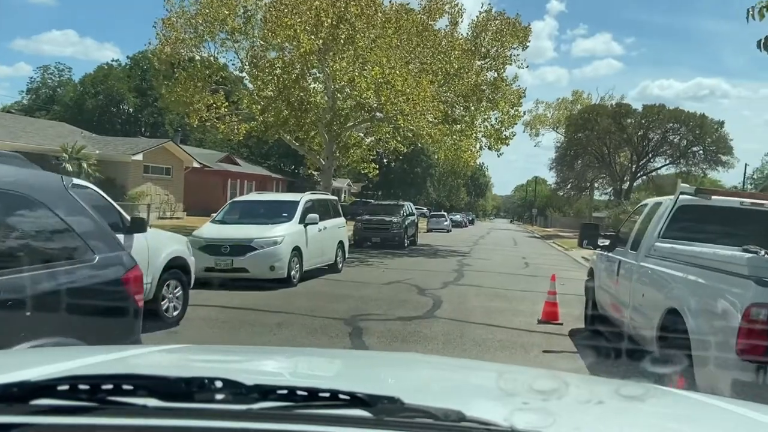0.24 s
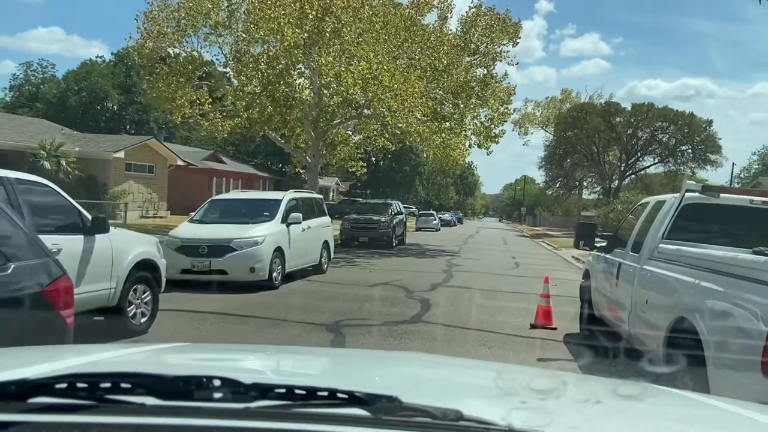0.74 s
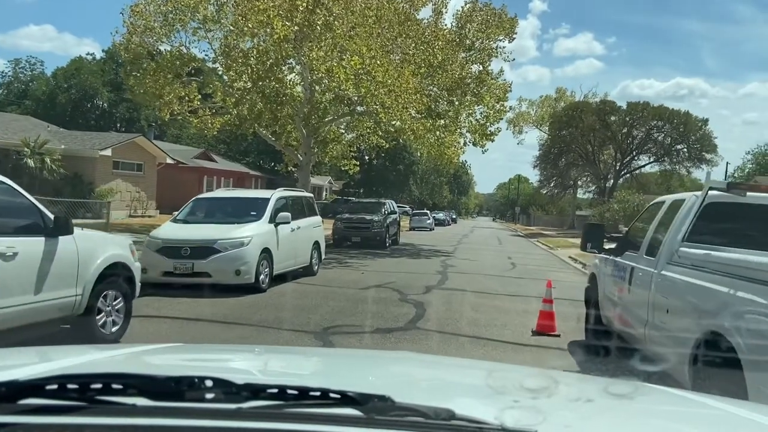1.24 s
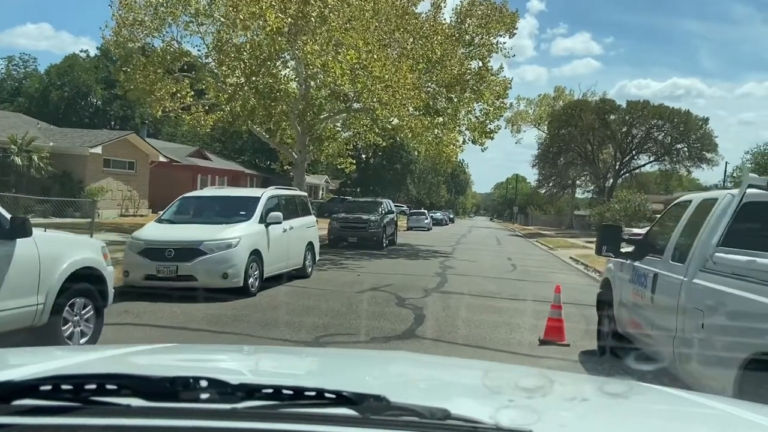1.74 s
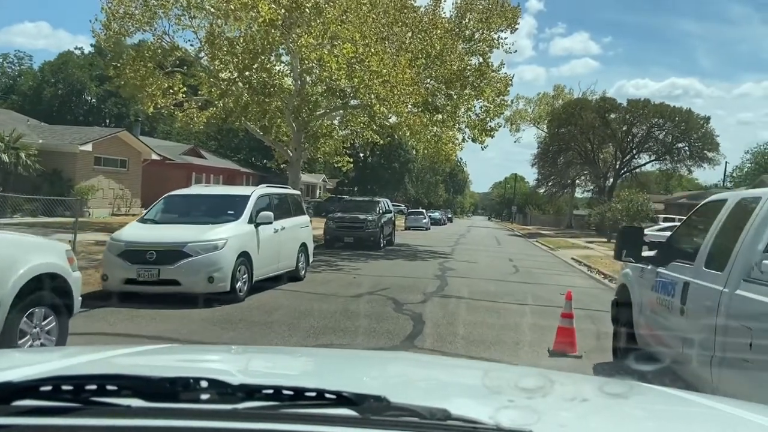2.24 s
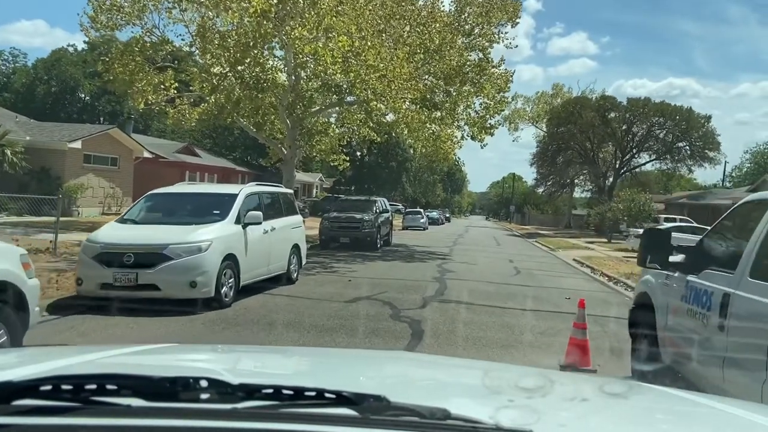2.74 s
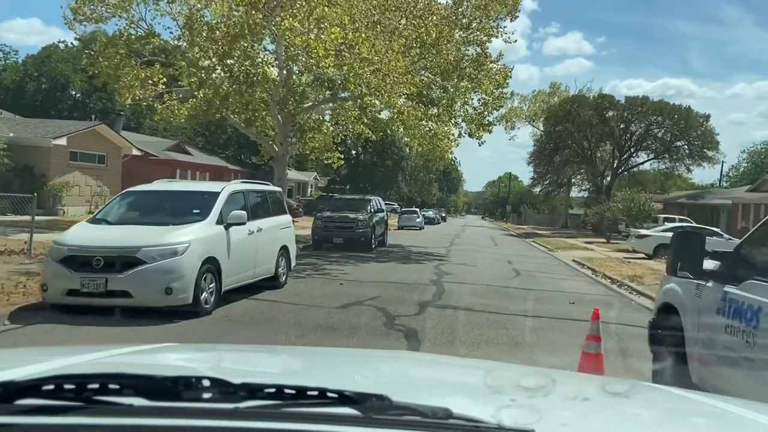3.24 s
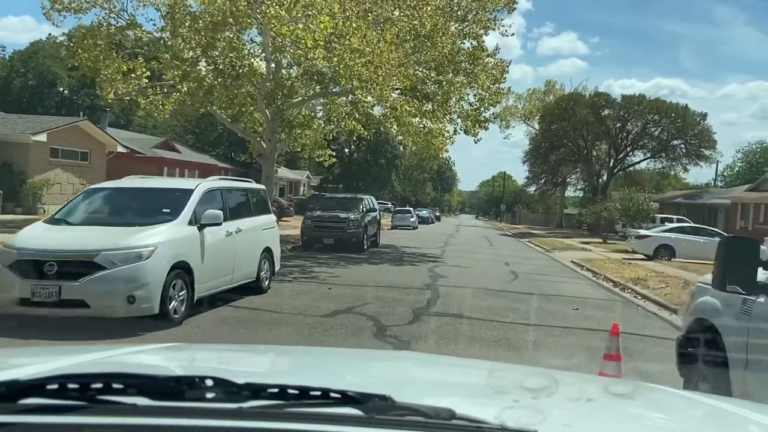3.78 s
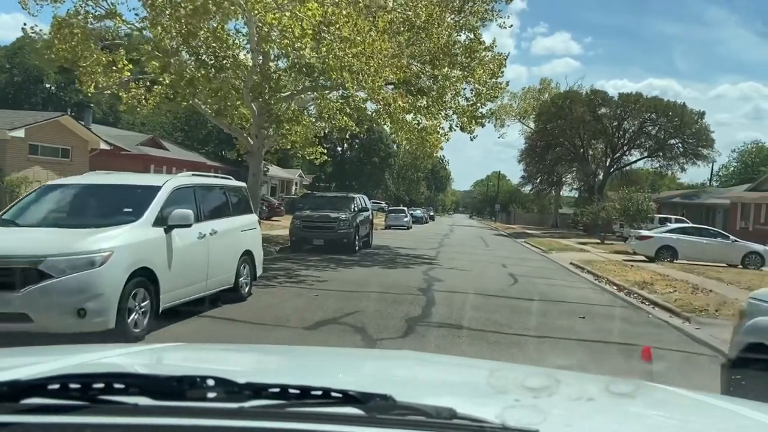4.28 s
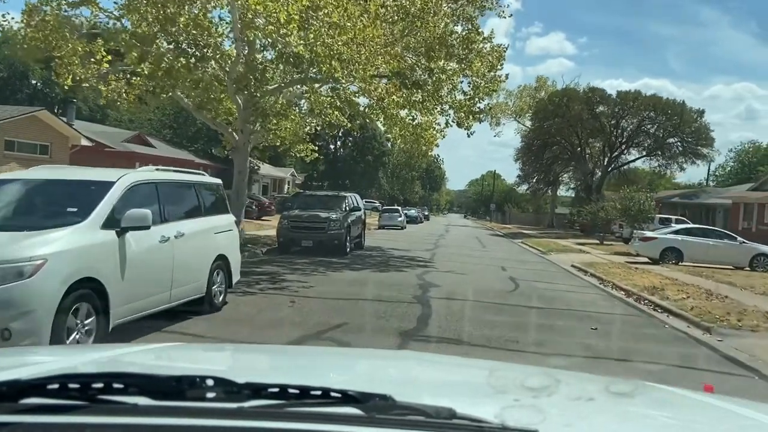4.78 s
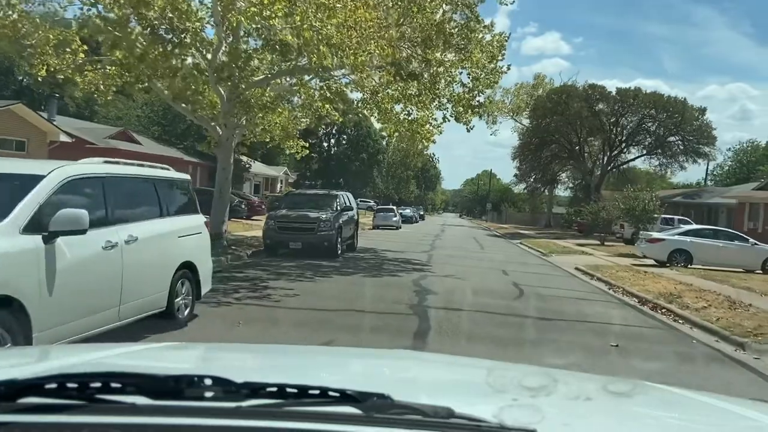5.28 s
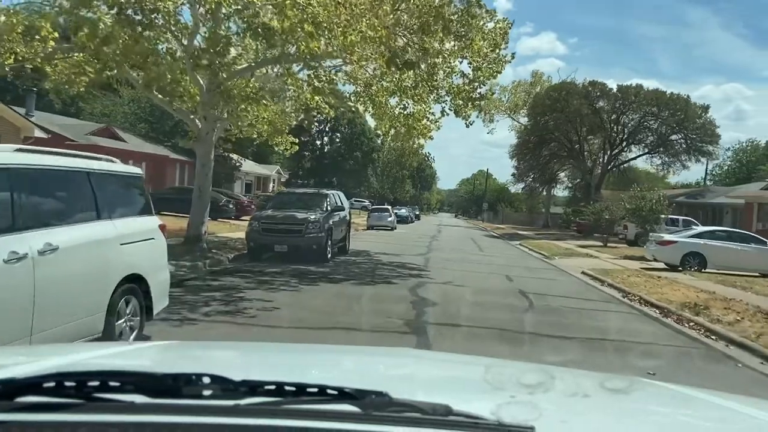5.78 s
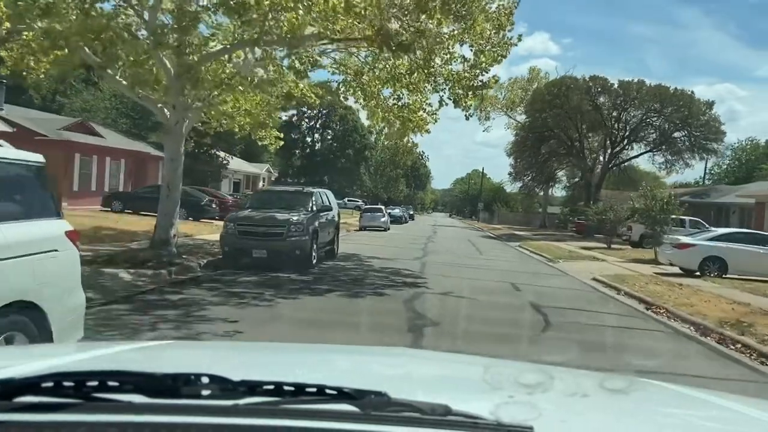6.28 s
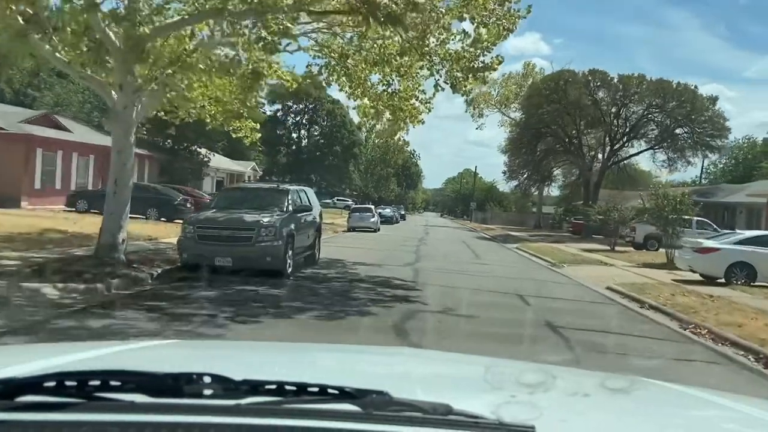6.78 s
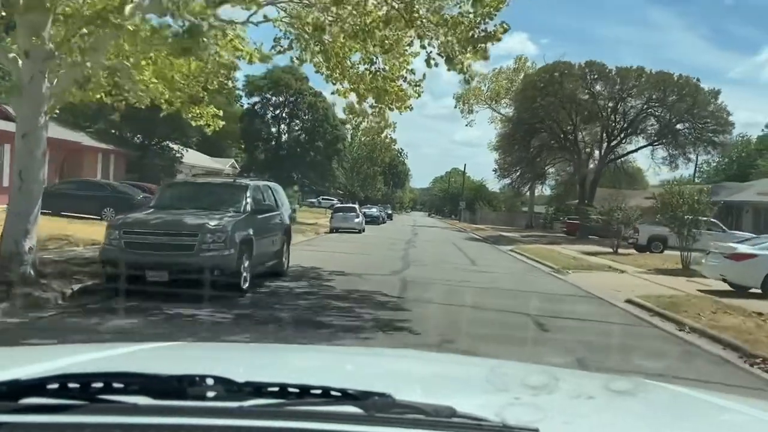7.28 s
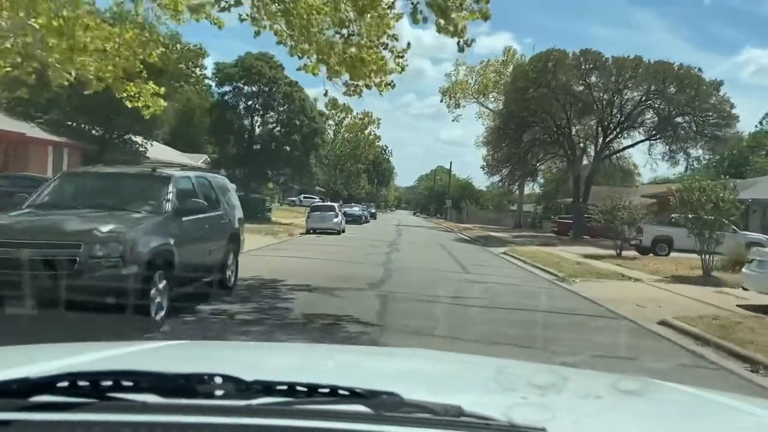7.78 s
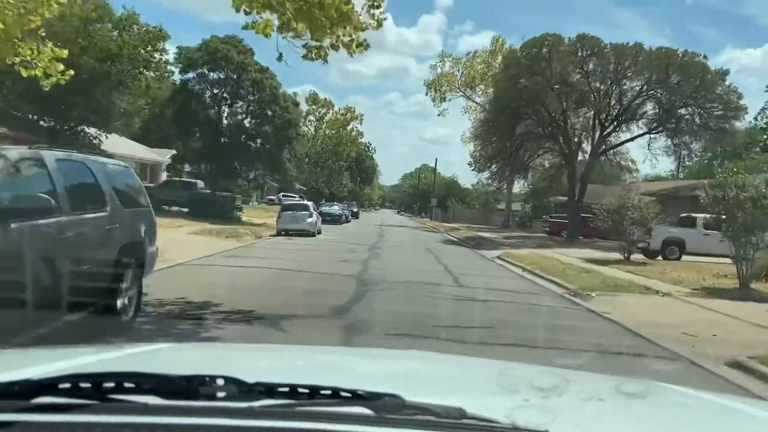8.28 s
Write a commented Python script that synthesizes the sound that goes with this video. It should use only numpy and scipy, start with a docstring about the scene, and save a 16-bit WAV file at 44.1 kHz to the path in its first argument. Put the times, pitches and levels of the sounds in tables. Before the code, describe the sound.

Heard inside a pickup cab creeping along a residential street: a soft, lumpy low idle with blower hum and airy vent hiss. A dull padded knock comes near three seconds. Around five seconds the engine revs up smoothly, booming and growling through the panels, then holds a loud rising drone over road rumble, with faint trim ticks.

```python
"""Pickup cab, creeping at idle then pulling away

Inside the cab of an eight-cylinder pickup on a street, heard through two microphone ports.
The exhaust booms in sines at the firing rate and its half orders, coloured by the cab; panels growl
and sing through resonances. Body and road rumble and the rasp are shaped noise, the vent blower
hums in tones and hisses in noise, and struck modes make the trim knock and tick now and then."""
import sys
import numpy as np
from scipy import signal
from scipy.fft import rfft, irfft, next_fast_len
from scipy.io import wavfile

SR = 44100
rng = np.random.default_rng(int(sys.argv[2]) if len(sys.argv) > 2 else 0)


def unload_wav(signal):
    """Save mono or channel-first audio to the path in sys.argv[1] as 16-bit WAV at rate SR, clipped to [-1, 1]."""
    wavfile.write(
        sys.argv[1],
        SR,
        np.round(np.clip(np.atleast_2d(signal).T, -1, 1) * 32767).astype(np.int16),
    )


N = 376025

# Engine speed as firing rate: time_s, firing_hz
FIRING_RATE = [(0.0, 40.3), (0.75, 38.9), (1.4, 40.2), (2.5, 39.8), (3.0, 40.5), (3.4, 42.0), (3.75, 43.5),
               (3.9, 44.8), (4.05, 49.5), (4.2, 51.5), (4.33, 54.0), (4.6, 54.5), (4.75, 53.2), (4.9, 54.2),
               (5.14, 59.4), (5.46, 68.5), (5.73, 79.8), (5.95, 87.5), (6.15, 90.6), (6.5, 94.5),
               (6.7, 98.7), (7.0, 102.5), (7.28, 106.4), (7.5, 111.5), (7.75, 113.8), (8.0, 117.3),
               (8.53, 123.2)]
# Exhaust tones: cycle_multiple, relative_level_db at idle, gain_db per doubling of speed, waver_db
STRONG_ORDERS = [(8, -0.7, 1, 1), (16, -19, 0.5, 1)]
# What pipe and cab make of an exhaust tone, by its pitch: pitch_hz, mid_db, side_db
EXHAUST_PATH = [(30, -48.5, -69), (41, -69, -55), (43.7, -31, -46), (48.5, -17, -43), (52.2, -17, -39),
                (60.6, -12, -32), (69.5, -14, -32.5), (82, -14, -28.5), (88.7, -15, -32.5),
                (90.8, -16.5, -36.5), (108, -13.5, -29), (109.7, -13.5, -26.5), (113.8, -15, -19.5),
                (115.9, -30.5, -19.5), (118.6, -23.5, -22), (120.2, -34, -26), (121.3, -22, -28),
                (122.8, -15.5, -25), (123.2, -12, -24.5), (137, -10.5, -17.5), (156, -27, -29),
                (182, -20, -32.5), (185, -44.5, -39), (202.4, -19, -18), (223.3, -6.5, -8),
                (228.4, -13, -11), (237, -16, -20), (252, -17.5, -20)]
# Fifth multiple of the cycle rate, which with the fourth gives the growl its beat: firing_hz, level_db
FIFTH_MULTIPLE = [(39, -52), (62, -44), (72, -36.5), (80, -23), (88, -17), (92, -15), (95, -13),
                  (99, -15.5), (103, -16), (107, -19.5), (111, -20), (114, -20.5), (124, -24)]
# Fourth multiple of the cycle rate: firing_hz, level_db
FOURTH_MULTIPLE = [(39, -53), (54, -48), (80, -42.5), (100, -33.5), (107, -35), (111, -29.5), (117, -24),
                   (119, -30.5), (121, -21.5), (124, -25.5)]
# Uneven cylinders: cycle_multiple, relative_level_db at idle, gain_db per doubling of speed
WEAK_ORDERS = [(2, -1, 3), (3, 10, 3.5), (6, 7, 1), (7, 8.5, -3.5), (9, 2, 1), (10, -2.5, 3.5),
               (11, 3, 2.5), (12, -3, 0.5), (13, 2.5, 0.5), (24, 3, -3)]
# How the cab passes the weak orders: pitch_hz, gain_db
CAB = [(25, -31.5), (45, -10), (62, 2), (72, -3.5), (87, 2), (105, 2), (119, -12.5), (128, -2), (133, -6),
       (138, -11.5), (145, -13), (170, -15), (200, -9), (250, -12.5), (290, -18), (330, -11), (350, -18),
       (378, -9), (425, -28.5), (460, -9), (485, -15.5), (510, -4.5), (545, -28.5), (650, -37)]
# Width of the weak orders: pitch_hz, side_minus_mid_db
WEAK_SIDE = [(50, -25), (100, -10), (130, -8.5), (200, -2.5), (300, 6.5), (420, 8), (500, -3)]
# Firings turn lumpy again as the load eases: centre_s, half_length_s, waver_db
EASING = [(8.05, .22, 3)]
# Multiples of the cycle rate through the panels: cycle_multiple, mid_relative_db, side_relative_db
GROWL_ORDERS = [(14, -16, -18), (15, -18, -15.5), (17, -15, -6.5), (18, -21, -18), (19, -15, -10.5),
                (20, -13.5, -16), (21, -16, -20), (22, -19, -17.5), (23, -16.5, -16), (24, -13, -14.5),
                (25, -15.5, -18), (26, -19.5, -15), (27, -22, -13.5), (28, -13.5, -11), (29, -17.5, -16.5),
                (30, -17.5, -14), (31, -19.5, -18.5), (32, -16, -12.5), (33, -20, -14.5), (34, -14.5, -14),
                (35, -19.5, -16), (36, -16.5, -19), (37, -23, -18.5), (38, -18.5, -20), (39, -14, -17.5),
                (40, -10.5, -21), (41, -15, -17), (42, -19.5, -20.5), (44, -16.5, -18)]
# Engine growl through the panel modes: pitch_hz, density_db per Hz (relative)
GROWL = [(140, 0.5), (165, -8), (200, 0), (212, -3), (228, -0.5), (255, -0.5), (290, -5), (330, -1.5),
         (350, -5.5), (380, -3.5), (405, -16.5), (430, -21.5), (460, -16), (485, -16), (510, -13.5),
         (550, -28), (700, -39)]
# Growl against engine speed: firing_hz, relative_level_db
GROWL_BY_SPEED = [(39, -50), (45, -56.5), (54, -38), (65, -35), (100, -29.5), (124, -25)]
# Spectrum of the engine rasp: pitch_hz, density_db per Hz (relative)
RASP = [(1200, -9.5), (1900, 0), (2600, 2), (3100, 1.5), (3800, -4.5), (5000, -2), (6000, -8.5),
        (7400, -4.5), (8300, -19.5), (11000, -13.5), (16400, -26)]
# Throttle, heard as engine rasp: time_s, level_db
THROTTLE = [(0, -57), (2.2, -59), (3.3, -62.5), (4.2, -56.5), (4.9, -57), (5.7, -55), (7.4, -54),
            (8.2, -62.5), (8.53, -59)]
# Resonant swells at set times, low panel singing and a few bright noise bursts:
# pitch_hz, width_hz, peak_s, half_length_s, level_db (rms before the swell), side_minus_mid_db
PANELS = [(352, 19, 2.24, 0.46, -51, -5), (259.3, 18, 3.54, .4, -42.5, -3),
          (269.4, 18, 5.03, 0.27, -37, -10), (253.5, 16, 5.38, 0.25, -31, -10),
          (277.6, 22, 5.5, .2, -32, -7.5), (246.7, 20, 5.85, 0.28, -33.5, -0.5),
          (213, 14, 5.28, 0.39, -39, -5), (457.4, 21, 5.6, 0.23, -41.5, -9), (677, 40, 1.4, 1.3, -66, 5),
          (2580, 220, 5.99, .04, -54.5, -5), (5320, 500, 6.16, .03, -59, -1), (683, 15, 5.98, .35, -50, 3),
          (381.7, 18, 6.47, 0.18, -34.5, -11), (465, 30, 6.2, 0.19, -39, -8), (503, 21, 7.3, 0.7, -40, -4),
          (340.7, 21, 7.44, 0.48, -34.5, -6), (200.8, 4.9, 6.8, 0.2, -32.5, -7.5),
          (201, 11, 8.2, 0.34, -38, -4), (405.5, 24, 5.8, 0.96, -58, 7.5), (2740, 330, 7.02, .07, -53, -7),
          (2760, 380, 7.28, 0.09, -52, -4), (2670, 430, 5.95, 0.16, -55.5, -5)]
# Road speed: time_s, speed_m_per_s
ROAD_SPEED = [(0, 1.14), (3.4, 1.09), (4.2, 2), (4.9, 2.17), (5.7, 3.25), (6.8, 6.2), (8.53, 6.9)]
# Low body and road boom: pitch_hz, density_db per Hz (relative)
BOOM = [(12, -62), (20, -32.5), (27, -25), (39, -3), (60, 7), (79, -9.5), (98, -1.5), (115, -8.5),
        (132, -13.5), (151, -13.5), (170, -21.5), (220, -58.5), (370, -120)]
# Blower and idle in the panels: pitch_hz, density_db per Hz (relative)
DRONE = [(150, -12), (175, -10), (197, -6.5), (228, -8.5), (245, -6), (268, -1), (295, -10.5), (310, -13),
         (355, -13.5), (400, -24), (430, -26)]
# The drone sinks and swells: centre_s, half_length_s, change_db
DRONE_SWELLS = [(2.73, .3, -3), (1.36, .4, 1)]
# Road roar: pitch_hz, density_db per Hz (relative)
ROAR = [(400, -22), (430, -11.5), (460, 2.5), (485, -1.5), (510, 0), (545, -10), (600, -11), (680, -8.5),
        (800, -11.5), (1000, -16.5), (1400, -24.5)]
# Tyre thrum through the floor: pitch_hz, density_db per Hz (relative)
THRUM = [(14, -13.5), (22, -3.5), (32, -1.5), (42, 2), (55, -12)]
# Rougher and smoother patches of road: centre_s, half_length_s, boom_change_db
PATCHES = [(0.5, 1, 2), (1.6, 0.37, 0.5), (4.6, 0.4, -3), (5.7, 0.33, 7.5), (6.5, .4, -4.5), (7.25, .15, 8),
           (7.87, 0.16, 3), (8.28, .03, 13)]
# Blower tones: pitch_hz, level_db (rms), side_minus_mid_db, fade_start_s, fade_length_s, waver_db
BLOWER = [(70.55, -31, -20.5, 4.6, 0.46, 3.5), (56.57, -30, -15, 3, 0.27, 3),
          (241.8, -41.5, -0.5, 1.34, 1.6, 2.5), (483, -67.5, -2, 2.4, .4, 4),
          (665, -69, 12, 2.8, 0.45, 6.5), (2150, -65.5, 4, 1.9, 1.6, 4)]
# Vent hiss: pitch_hz, density_db per Hz (relative)
HISS = [(500, 2.5), (680, 4.5), (900, -1), (1350, -4.5), (1600, 2), (1880, 0.5), (2000, 4.5), (2150, 4.5),
        (2220, 2.5), (2290, 6), (2430, 1), (2520, 5), (2620, 0), (2780, 2), (3000, -3.5), (3120, -1.5),
        (3400, -1.5), (3600, -4.5), (4600, -9), (6000, -17.5), (8000, -38.5), (11000, -20), (16400, -42.5)]
# Vent hiss over time: time_s, level_db
HISS_LEVEL = [(0, -52.5), (1, -50.5), (2.2, -51), (3.2, -54.5), (4.2, -57), (5.3, -55.5), (6.4, -54),
              (8.53, -50)]
# Parked cars alongside throw hiss and rasp back: centre_s, half_length_s, rise_db
PARKED = [(5.92, 0.39, 3.5), (7.25, 0.56, 3)]
# Knock contacts and bounces: start_s, relative_level_db
KNOCKS = [(2.8943, -15.5), (2.8963, -13.5), (2.9088, -28), (2.926, -25), (2.952, -31), (5.853, -23.5)]
# What a knock rings: pitch_hz, relative_level_db, t60_s
KNOCK_MODES = [(515, -6, 0.012), (188, -20.5, 0.082)]
# Trim ticks: start_s, relative_level_db, brightness_hz
TICKS = [(3.6266, -52, 3500), (5.359, -61, 7000), (5.8493, -47, 15000), (5.8565, -46, 2500),
         (6.2793, -41.5, 4600), (6.5316, -50, 6900), (6.916, -51.5, 7000)]
# What a tick rings: pitch_hz, relative_level_db, t60_s
TICK_MODES = [(1500, 4, 0.0033), (2610, -0.5, 0.004), (3900, -1, 0.0043), (5340, 5, 0.0022),
              (6600, 4.5, 0.0022), (10940, 0, 0.0053)]
# Cab modes make the ports alike at some pitches, opposed at others: pitch_hz, side_minus_mid_db
WIDTH = [(40, -23), (90, -13.5), (125, -1.5), (200, -6.5), (250, -3), (340, -6.5), (420, 13.5), (500, -3),
         (590, 9.5), (680, 5.5), (900, 6.5), (1400, 8), (2300, -4), (4400, -1.5), (9000, 0.5)]
# Balance of the two ports: pitch_hz, left_minus_right_db
TILT = [(60, 0.5), (125, -3.5), (300, 1.5), (1000, 1), (2400, 2), (4400, 3.5), (9000, -0.4)]

IDLE_HZ, FIRINGS_PER_CYCLE = 40, 8
IDLE_WAVER_DB, SETTLED_DOUBLINGS = 3, 0.3  # firings are lumpier at idle
UNDERTONE_SIDE_DB, UNDERTONE_WAVER_DB = -21.5, -0.8  # lumpiness adds to this waver
LUMP_RADIANS_PER_DB = 0.2  # lumpy firings also shift the undertones in time
WEAK_DB = -36  # base level of the weak orders
SIDE_LAG = 0.84  # radians by which a tone's left-right difference trails its sum
GROWL_NOISE_DB = -4
PANEL_CYCLE_SHARE, PANEL_CYCLE_TOP_HZ = 0.5, 600  # low panels are driven partly by the engine cycle
BOOM_DB, DRONE_DB = -30, -40
DRONE_SHARE, ROAR_SHARE = 0.39, 0.2  # of the boom's change over road patches
ROAR_DB, ROAR_DB_PER_DOUBLING = -57.5, 6.5  # at one metre a second
THRUM_DB, THRUM_DB_PER_DOUBLING = -58, 4.5  # at one metre a second
KNOCK_CONTACT_S = 0.0021
RATTLE_GAP_S, RATTLE_SPREAD_DB = 0.0013, 2.5
CUTOFF_HZ = 16400


def engine():
    """Sines locked to the crank: eight firings make one full cycle."""
    firing_hz = in_time(FIRING_RATE)[0]
    cycle_hz = firing_hz / FIRINGS_PER_CYCLE
    doublings = np.log2(firing_hz / IDLE_HZ)
    cycle = 2 * np.pi * np.cumsum(cycle_hz) / SR
    lumps_db = IDLE_WAVER_DB * np.clip(1 - doublings / SETTLED_DOUBLINGS, 0, 1) + swells(EASING)
    out = np.zeros((2, N))
    for k, order_db, gain_db, waver_db in STRONG_ORDERS:
        k = round(k)
        db = order_db + gain_db * doublings + (waver_db + lumps_db) * drift(4.1)
        mid_db = db + at_hz(EXHAUST_PATH, k * cycle_hz)
        side_db = db + at_hz(EXHAUST_PATH, k * cycle_hz, column=2)
        out += tone(k * cycle + k, mid_db, side_db)
    for k, levels in ((5, FIFTH_MULTIPLE), (4, FOURTH_MULTIPLE)):
        db = at_hz(levels, firing_hz) + (UNDERTONE_WAVER_DB + lumps_db) * drift(3.9)
        shift = LUMP_RADIANS_PER_DB * lumps_db * drift(4.5)
        out += tone(k * cycle + k + shift, db, db + UNDERTONE_SIDE_DB)
    # the weak orders swell as they cross a resonance of the cab, and blur as firings vary
    for k, order_db, gain_db in WEAK_ORDERS:
        k = round(k)
        db = WEAK_DB + order_db + gain_db * doublings + at_hz(CAB, k * cycle_hz)
        db = db + (1.2 + lumps_db) * drift(5.3)
        phase = k * (cycle + 0.015 * drift(0.97)) + rng.uniform(0, 2 * np.pi)
        out += tone(phase, db, db + at_hz(WEAK_SIDE, k * cycle_hz))
    return out


def growl_tones():
    """The comb of cycle multiples, each swelling as it crosses a panel mode."""
    firing_hz = in_time(FIRING_RATE)[0]
    cycle_hz = firing_hz / FIRINGS_PER_CYCLE
    cycle = 2 * np.pi * np.cumsum(cycle_hz) / SR + 0.012 * drift(2.5)
    load_db = at_hz(GROWL_BY_SPEED, firing_hz)
    out = np.zeros((2, N))
    for k, mid_db, side_db in GROWL_ORDERS:
        k = round(k)
        db = load_db + at_hz(GROWL, k * cycle_hz) + 2.5 * drift(3.0)
        phase = k * cycle + rng.uniform(0, 2 * np.pi)
        out += tone(phase, db + mid_db, db + side_db + at_hz(WIDTH, k * cycle_hz))
    return out


def growl_noise():
    """Noise through the panel modes; its level follows engine speed and it throbs at a rate tied to it."""
    level_db = GROWL_NOISE_DB + at_hz(GROWL_BY_SPEED, in_time(FIRING_RATE)[0])
    return noise(GROWL, level_db, 1.6, 3.4) * pulsing(0.32, 1.6)


def panels():
    """Noise, and engine cycle for low panels, twice through a narrow resonance, swelling at set times."""
    t = np.arange(N) / SR
    white = rng.standard_normal((2, 2, N))
    cycle_hz = in_time(FIRING_RATE)[0] / FIRINGS_PER_CYCLE
    # one kick per full cycle, scaled to unit power
    kicks = np.diff(np.floor(np.cumsum(cycle_hz) / SR), prepend=0) * np.sqrt(SR / cycle_hz)
    out = np.zeros((2, N))
    for k, (hz, width_hz, peak_s, half_s, level_db, side_db) in enumerate(PANELS):
        r = np.exp(-np.pi * width_hz / SR)
        share = PANEL_CYCLE_SHARE * (hz < PANEL_CYCLE_TOP_HZ)
        drive = np.sqrt(1 - share) * white[k % 2] + np.sqrt(share) * kicks
        section = [1, 0, -1, 1, -2 * r * np.cos(2 * np.pi * hz / SR), r * r]
        sung = rms_one(signal.sosfilt([section, section], drive))
        swell = np.exp(-((t - peak_s) / half_s) ** 2)
        out += sung * amp([[level_db], [level_db + side_db]]) * swell
    return out


def rasp():
    """Bright engine noise that follows the throttle and pulses at a rate tied to engine speed."""
    return noise(RASP, in_time(THROTTLE)[0] + swells(PARKED), 1.0, 21) * pulsing(0.065, 0.94)


def rumble():
    """Boom, drone and roar as shaped noise over the road's patches; roar and thrum grow with speed."""
    rough_db = swells(PATCHES)
    road_doublings = np.log2(in_time(ROAD_SPEED)[0])
    drone_db = DRONE_DB + DRONE_SHARE * rough_db + swells(DRONE_SWELLS)
    roar_db = ROAR_DB + ROAR_DB_PER_DOUBLING * road_doublings + ROAR_SHARE * rough_db
    thrum_db = THRUM_DB + THRUM_DB_PER_DOUBLING * road_doublings
    boom = noise(BOOM, BOOM_DB + rough_db, 0.77, 8.6)
    drone = noise(DRONE, drone_db, 1.1, 4.7)
    roar = noise(ROAR, roar_db, 0.99, 15.0)
    thrum = noise(THRUM, thrum_db, 2.0, 5.0)
    return boom + drone + roar + thrum


def blower():
    """Tones that waver and fade out at their own set times."""
    t = np.arange(N) / SR
    out = np.zeros((2, N))
    for hz, level_db, side_db, fade_s, length_s, waver_db in BLOWER:
        phase = 2 * np.pi * np.cumsum(hz * (1 + 0.002 * drift(1))) / SR
        db = level_db + waver_db * drift(3.0)
        out += tone(phase, db, db + side_db) * np.clip(1 - (t - fade_s) / length_s, 0, 1)
    return out


def vent_hiss():
    """Vent air as shaped noise, thrown back louder by parked cars."""
    return noise(HISS, in_time(HISS_LEVEL)[0] + swells(PARKED), 0.98, 21)


def trim():
    """Dull padded knocks and a few ticks; a longer contact smooths the knock."""
    push = np.hanning(round(KNOCK_CONTACT_S * SR))
    padded = np.convolve(ring(KNOCKS, KNOCK_MODES), push / push.sum())[:N]
    ticks = sum(rattle(*tick) for tick in TICKS)
    return padded * amp([[6], [-4]]) + ticks * amp([[0], [-8]])  # rows are mid, side


def rattle(s, level_db, bright_hz, count=5):
    """A few quick uneven contacts ring the tick modes in a wide band below their brightness."""
    gaps, sizes = rng.uniform(0.52, 1.7, count), rng.standard_normal(count)
    times = s + RATTLE_GAP_S * (np.cumsum(gaps) - gaps[0])
    contacts = list(zip(times, level_db + RATTLE_SPREAD_DB * sizes))
    band = signal.butter(3, [bright_hz / 6, bright_hz], "band", fs=SR, output="sos")
    return signal.sosfilt(band, ring(contacts, TICK_MODES))


def ring(events, modes):
    """Each blow sets the modes ringing as decaying sines."""
    clicks = np.full(N, 1e-18)
    clicks[[round(e[0] * SR) for e in events]] = amp([e[1] for e in events])
    out = np.zeros(N)
    for hz, level_db, t60 in modes:
        r, w = amp(-60 / (t60 * SR)), 2 * np.pi * hz / SR
        out += signal.lfilter([0, amp(level_db) * np.sin(w)], [1, -2 * r * np.cos(w), r * r], clicks)
    return out


def tone(phase, mid_db, side_db):
    """A sine of given rms level in mid and side."""
    mid = amp(mid_db) * np.sin(phase)
    side = amp(side_db) * np.sin(phase - SIDE_LAG)
    return np.sqrt(2) * np.array([mid, side])


def noise(spectrum, level_db, flicker_db, flicker_hz):
    """Coloured mid and side noise whose level flickers."""
    hz = np.maximum(np.fft.rfftfreq(N, 1 / SR), 1)
    shape = amp(at_hz(spectrum, hz)) * (hz > spectrum[0][0]) * (hz < spectrum[-1][0])
    widths = np.array([np.ones(len(hz)), amp(at_hz(WIDTH, hz))])
    mid, side = irfft(rfft(rng.standard_normal((2, N))) * shape * widths, N)
    return np.array([mid, side]) / np.std(mid) * amp(level_db + flicker_db * drift(flicker_hz))


def pulsing(depth, firings_apart):
    """Unit-power gain that throbs once per given number of firings."""
    phase = 2 * np.pi * np.cumsum(in_time(FIRING_RATE)[0] / firings_apart) / SR
    return (1 + depth * np.cos(phase)) / np.sqrt(1 + depth ** 2 / 2)


def swells(events):
    """Bell-shaped rises or dips in dB."""
    t = np.arange(N) / SR
    return sum(change_db * np.exp(-((t - s) / half_s) ** 2) for s, half_s, change_db in events)


def drift(rate_hz):
    """Slow chance of spread 1: low-passed noise made at every 40th sample."""
    r = np.exp(-2 * np.pi * rate_hz * 40 / SR)
    slow = signal.lfilter([1], [1, -2 * r, r * r], rng.standard_normal(N // 40 + 2002))[2000:]
    return np.interp(np.arange(N) / 40, np.arange(len(slow)), rms_one(slow))


def amp(db):
    """dB to gain."""
    return np.exp(np.asarray(db) * (np.log(10) / 20))


def rms_one(x):
    """Scale to unit rms."""
    return x / np.sqrt(np.mean(x ** 2) + 1e-20)


def in_time(rows):
    """Columns of a curve table at every sample."""
    s, *columns = np.transpose(rows)
    return [np.interp(np.arange(N) / SR, s, c) for c in columns]


def at_hz(points, hz, column=1):
    """Read a table column on a log-frequency axis."""
    table = np.array(points)
    return np.interp(np.log(hz), np.log(table[:, 0]), table[:, column])


def ports(mid_side):
    """Mid and side become left and right; one port hears some bands a little louder."""
    pad = 8192  # mirrored, tapered ends keep the filter from wrapping round
    wide = np.pad(mid_side, ((0, 0), (pad, pad)), "reflect", reflect_type="odd")
    wide = wide * signal.windows.tukey(N + 2 * pad, pad / N)
    size = next_fast_len(N + 2 * pad)
    hz = np.maximum(np.fft.rfftfreq(size, 1 / SR), 1)
    step = amp(at_hz(TILT, hz) / 2)
    mid, side = rfft(wide, size)
    return irfft(np.array([(mid + side) * step, (mid - side) / step]), size)[:, pad:pad + N]


def scene():
    """Tones, rumble, air and blows meet at the two ports."""
    motor = engine() + growl_tones() + growl_noise() + panels() + rasp()
    return ports(motor + rumble() + blower() + vent_hiss() + trim())


def record(dry):
    """A steep low-pass cuts the top."""
    return signal.sosfilt(signal.cheby2(12, 70, CUTOFF_HZ, fs=SR, output="sos"), dry)


dry = scene()
out = record(dry)
unload_wav(out)
```